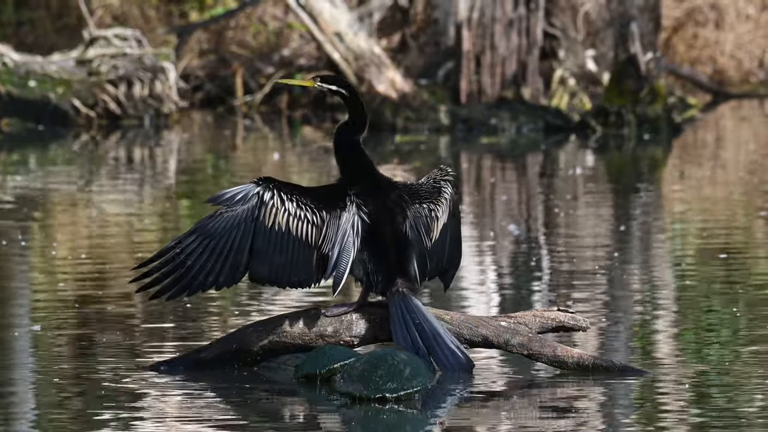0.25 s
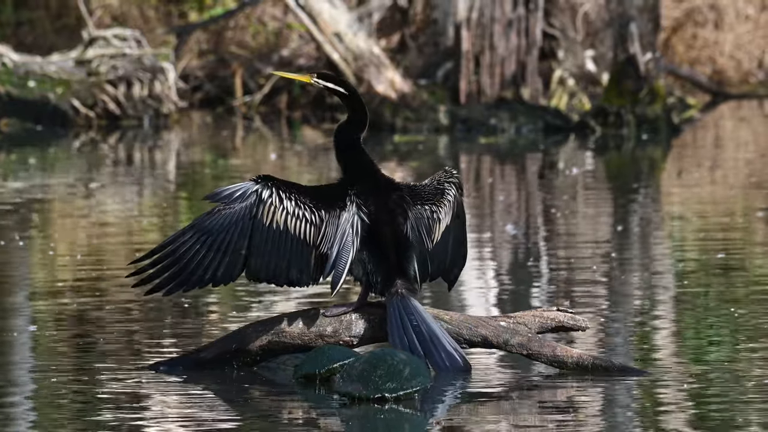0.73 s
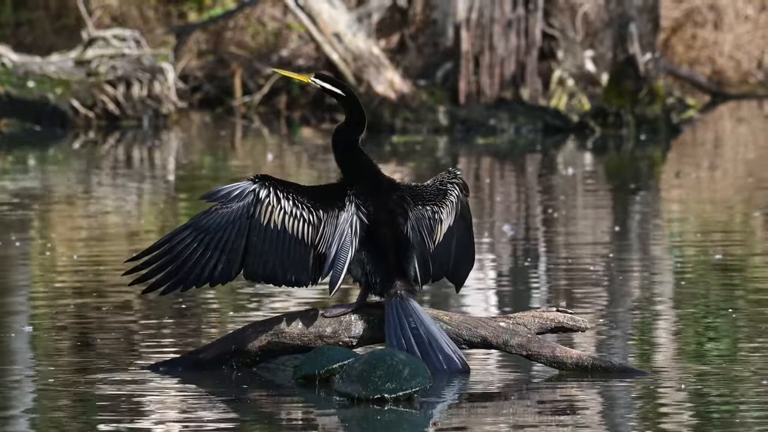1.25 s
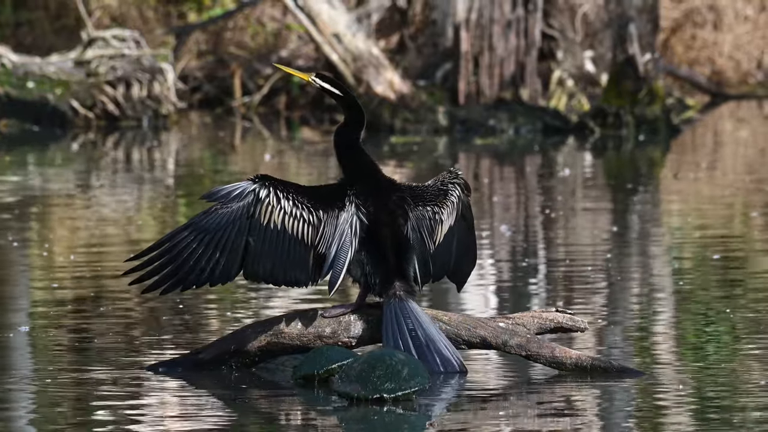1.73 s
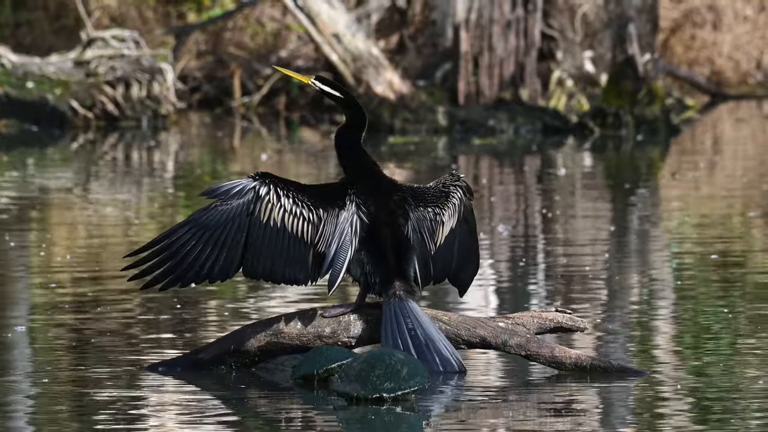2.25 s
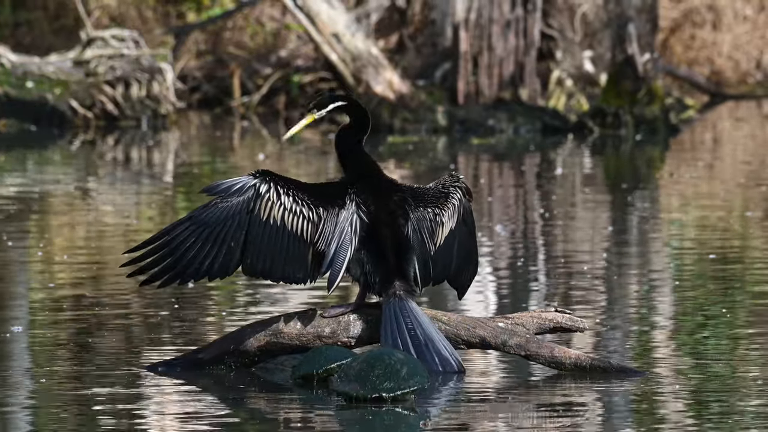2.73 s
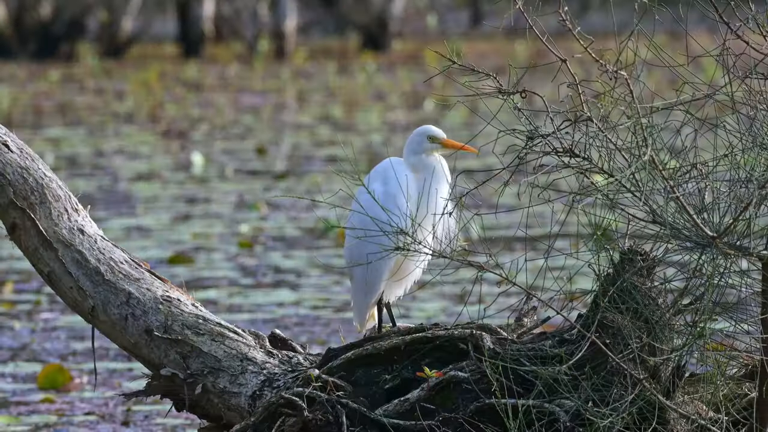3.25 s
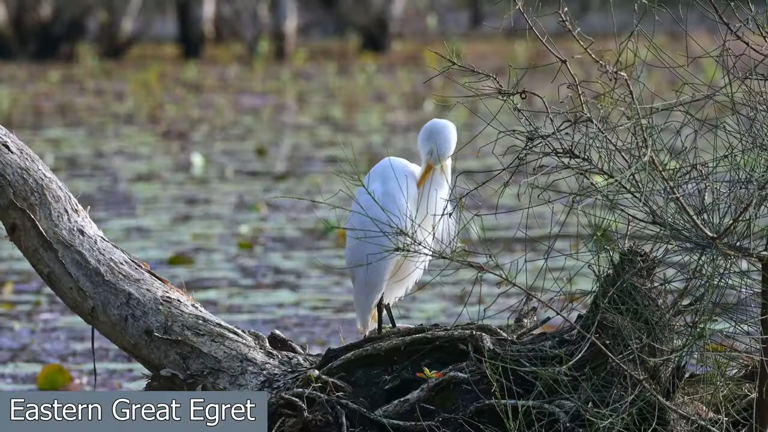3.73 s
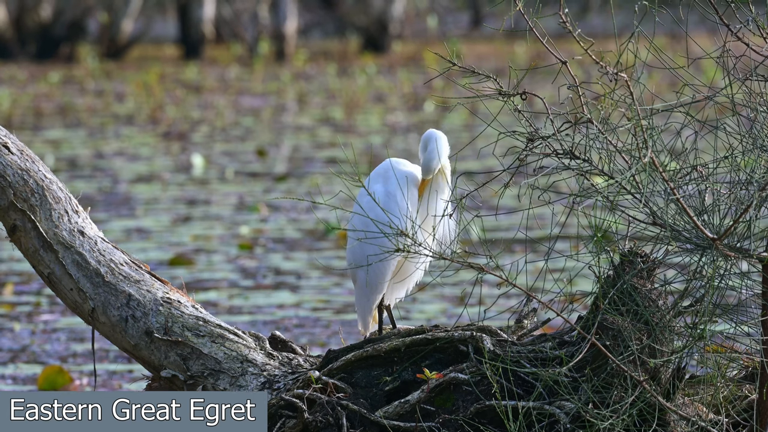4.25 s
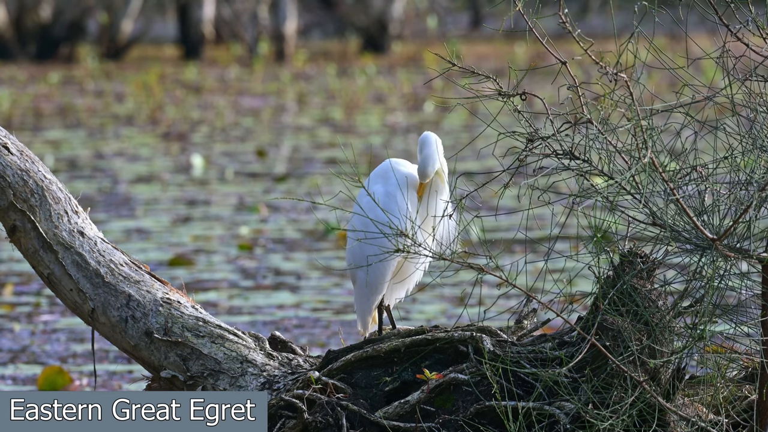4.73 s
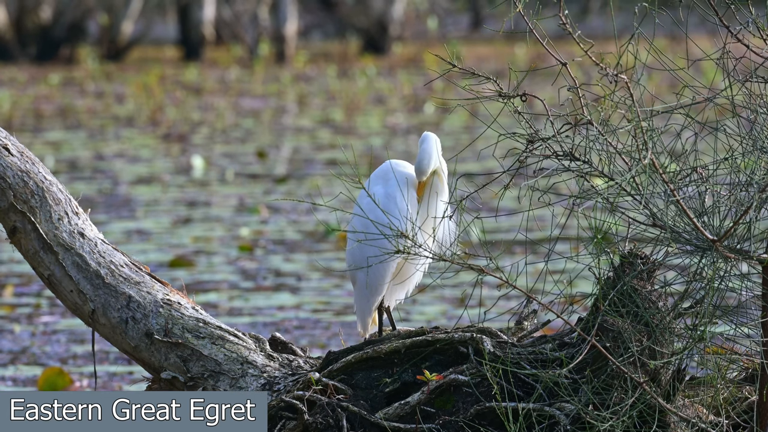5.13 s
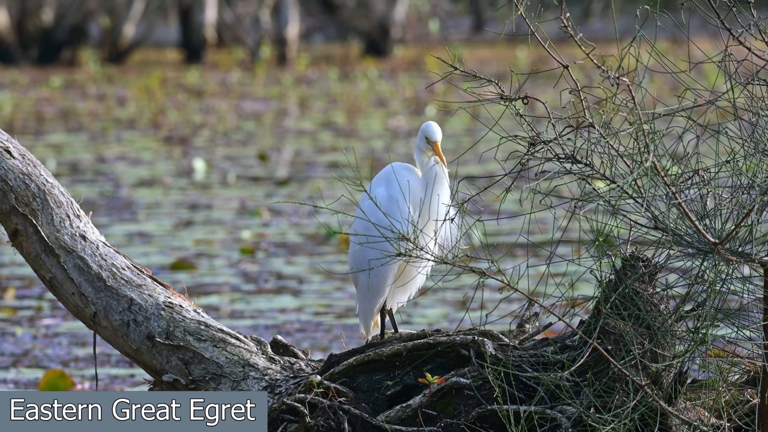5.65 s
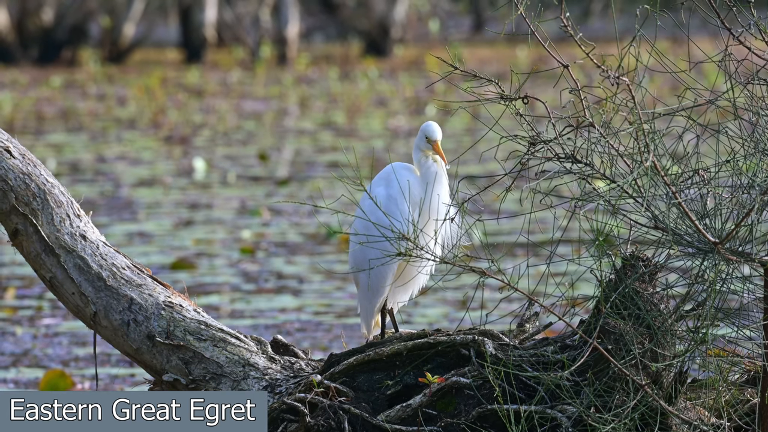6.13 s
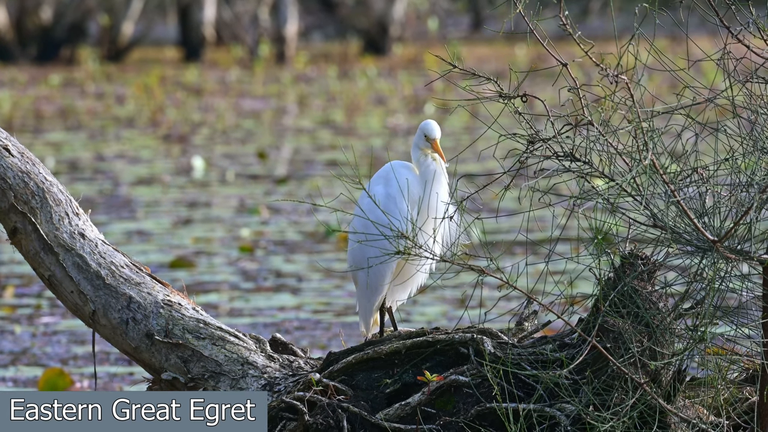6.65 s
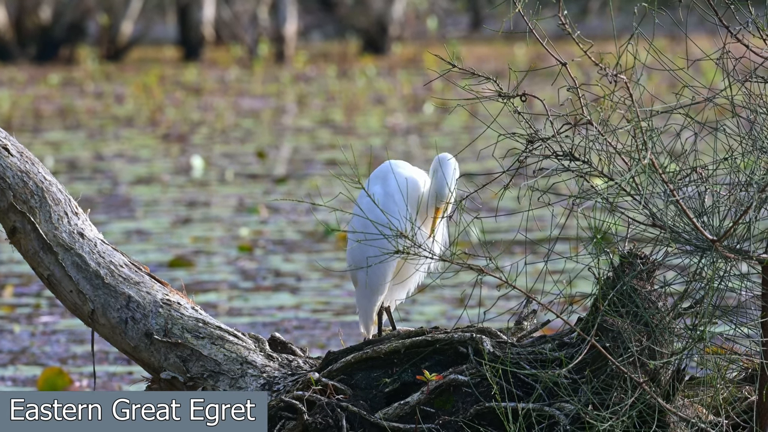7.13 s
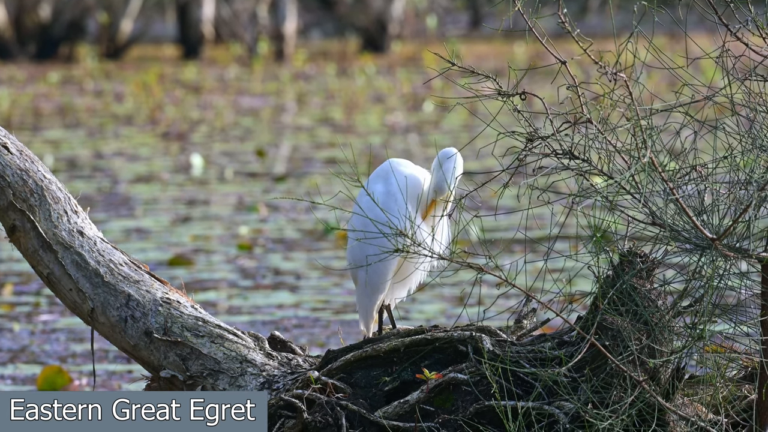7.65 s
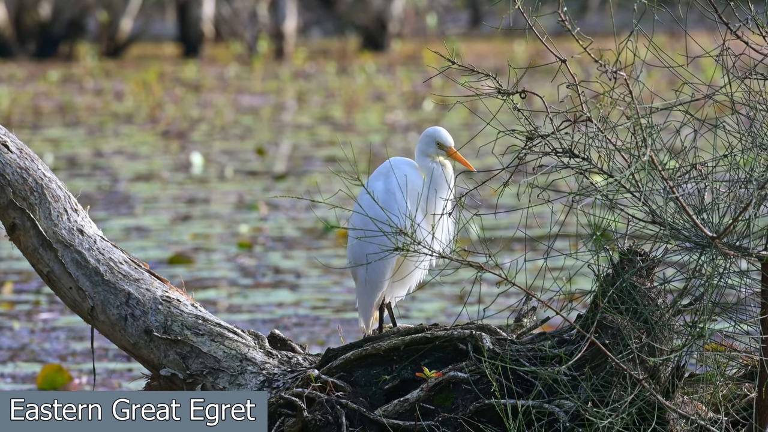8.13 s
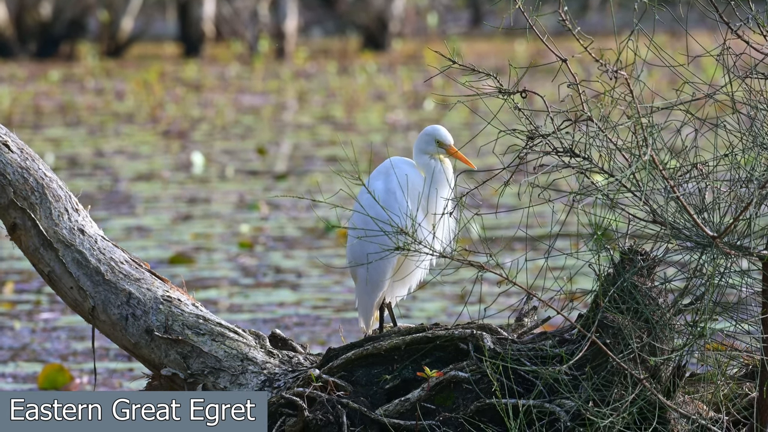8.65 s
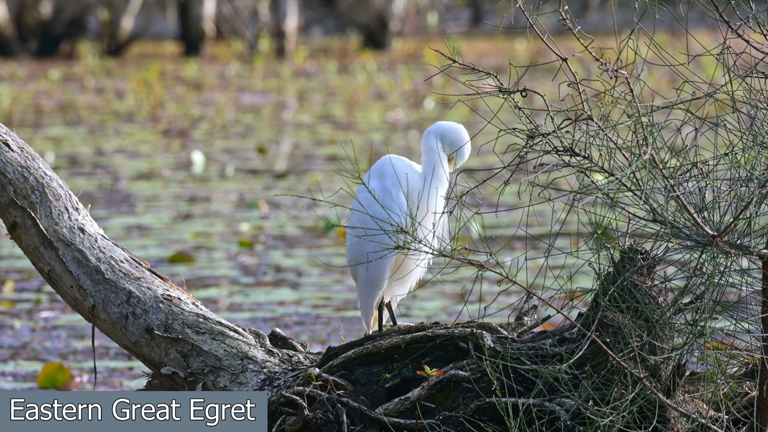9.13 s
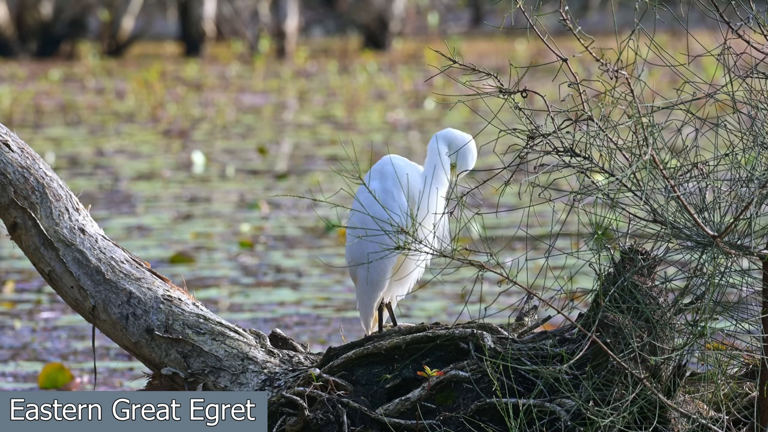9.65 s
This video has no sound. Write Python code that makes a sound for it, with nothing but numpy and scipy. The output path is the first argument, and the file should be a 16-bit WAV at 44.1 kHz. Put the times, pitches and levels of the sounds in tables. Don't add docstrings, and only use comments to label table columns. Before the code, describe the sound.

Dense small-bird chorus chirps and whistles over a steady low rumble and hiss, then after three seconds the background drops and brighter, more separate calls continue.

```python
import sys
import numpy as np
from scipy import signal
from scipy.fft import rfft, irfft, next_fast_len
from scipy.io import wavfile
from scipy.ndimage import uniform_filter1d, map_coordinates

SR = 44100
rng = np.random.default_rng(int(sys.argv[2]) if len(sys.argv) > 2 else 0)


def dump(signal):
    limited = np.clip(np.atleast_2d(signal).T, -1, 1)
    pcm = np.round(limited * 32767).astype(np.int16)
    wavfile.write(sys.argv[1], SR, pcm)


def voltage_ratio(level):
    return 10 ** (np.asarray(level, float) / 20)


N = 435708

# time in seconds, first place in dB, second place in dB.
PLACE_LEVELS = [(0, -45.5, -93), (2.85, -45.5, -55.5), (3.0, -52.5, -54), (3.2, -78.5, -58.5),
                (9.88, -100, -58)]
# frequency in Hz, level in dB per Hz.
ROAD_SPECTRUM = [(15, -24), (71, 2), (161, -1), (483, -8.5), (899, -9), (2400, -27), (6000, -55),
                 (9000, -47), (15000, -56)]
BANK_SPECTRUM = [(12, -46), (20, -17), (75, -2.5), (255, -6.5), (693, -20), (1890, -27.5), (2400, -22),
                 (3120, -59)]
# frequency in Hz, likeness from 0 to 1.
EAR_LIKENESS = [(30, 1), (200, 0.98), (500, 0.88), (1200, 0.65), (3000, 0.2), (8000, 0.23)]
# frequency in Hz, left minus right in dB.
EAR_LEAN = [(60, -0.5), (500, -0.5), (2500, -1.5), (8000, 4)]
# pitch in Hz, level in dB rms, place (0 first, 1 second).
MOTOR_HUMS = [(177.6, -60, 0), (893.6, -66, 0), (274.5, -68.5, 1)]

# lowest Hz, highest Hz.
FAR_RANGES = [(2500, 4680), (4600, 7570), (7400, 12100)]
# start in seconds, held seconds, level in dB, lead of the
# high voices in dB.
FAR_OUTBURSTS = [(0, 0.45, -41.5, -3.5), (.78, 0.067, -49.5, 3), (1.4, 0.22, -43, -6),
                 (2.12, 0.012, -41, -9.5), (2.3, 0.14, -50, -20), (2.7, 0.13, -47, -4), (1.75, .03, -51, 3),
                 (3.16, .01, -56, 0), (3.3, 0.2, -50.5, -1.5), (3.63, 0.051, -54.5, 2),
                 (4.05, 0.04, -75.5, 20.5), (4.37, .01, -47.5, -40), (4.46, 0.009, -57.5, 10.5),
                 (4.99, 0.015, -55, 2.5), (5.33, 0.015, -52, 5.5), (5.8, 0.046, -56, 4),
                 (6.26, 0.011, -50.5, -9), (6.4, 0.38, -54, 6.5), (7.08, .01, -48, -26),
                 (7.189, 0.0083, -51, 3), (7.43, 0.016, -46.5, -6), (8.01, 0.008, -53, -17),
                 (8.281, 0.12, -44.5, -6.5), (8.87, 0.017, -47.5, 3.5), (9.08, 0.24, -51.5, -7),
                 (9.85, .03, -51.5, -5.5)]
# share of the lead from 0 to 1, offset in dB, swell in dB
# per second, ebb in dB per second, lull in dB.
FAR_REGISTERS = [(0.016, -1, 47, 52.5, -59), (0.9, -3, 100, 102, -63.5), (0.3, -14.5, 261, 169, -91.5)]

PURE_OVERTONES = [0.5, -16, -33]
REEDY_OVERTONES = [0.5, -3, -13.5, -22.5, -20]
SHARP_OVERTONES = [-13, -6, -14, -12]
CROAK_OVERTONES = [-40, -40, -24, -5, 1.5, -10, -17, -14.5]
BUZZ_OVERTONES = [.5, -20, -14, -4]
NASAL_OVERTONES = [.5, 4, -14, -18]
SWOOP_OVERTONES = [.5, 0, -16, -22, -22]

# frequency in Hz, level in dB.
SQUAWK_MOUTH = [(800, -13.5), (1500, 7), (3000, 13.5), (4100, 18), (5500, 15.5), (7000, 8), (9000, -14),
                (15000, -26)]
CLIMB_MOUTH = [(3700, 0), (5000, 8), (6200, 2), (7200, -12), (9500, -11), (15000, -11)]

# start in seconds, length in seconds, start pitch in Hz,
# end pitch in Hz, level in dB.
CLEAR_SQUAWKS = [(3.29, 0.048, 1420, 1556, -62.5), (3.345, .055, 1266, 1350, -58),
                 (6.091, 0.081, 1336, 1330, -65), (8.225, 0.043, 1396, 1526, -60),
                 (9.193, 0.087, 991, 1158, -62.5), (9.278, 0.022, 1148, 1020, -64),
                 (5.257, 0.016, 1326, 1340, -60), (7.352, .018, 1330, 1350, -62.5)]
HARSH_SQUAWKS = [
    (.26, 0.24, 945, 1070, -64),
    (.655, 0.23, 930, 1000, -56.5),
    (9.09, 0.24, 986, 1042, -66),
]

# start in seconds, length in seconds,
# start pitch in Hz, end pitch in Hz, level in dB.
LEFT_PURE_CRESTS = [(0.002, 0.037, 5300, 5120, -46), (6.1, 0.063, 3960, 3920, -53),
                    (5.338, 0.05, 3750, 4340, -40), (6.183, 0.066, 3300, 4410, -43.5),
                    (7.018, 0.036, 3700, 4190, -51), (7.437, 0.045, 3910, 4310, -40.5),
                    (8.015, 0.033, 4060, 4160, -50.5)]
LEFT_PURE_SAGS = [(6.982, 0.045, 3380, 3660, -53.5), (7.372, 0.029, 3800, 4100, -42.5),
                  (8.234, 0.036, 3590, 3820, -48.5)]
RIGHT_PURE_CRESTS = [(1.998, .016, 4080, 3950, -46), (2.055, 0.017, 3950, 4070, -46),
                     (3.362, 0.059, 3900, 4000, -56), (3.862, 0.011, 3150, 3000, -43),
                     (4.209, 0.082, 4050, 4280, -50), (4.323, 0.035, 3290, 4340, -45),
                     (5.809, 0.018, 4500, 4070, -40), (6.556, 0.027, 4440, 4120, -37.5),
                     (7.456, 0.016, 2310, 2590, -42), (7.472, 0.011, 2600, 2350, -45),
                     (8.346, 0.021, 3940, 4000, -34.5), (8.428, 0.026, 4170, 3970, -31.5)]
RIGHT_PURE_SAGS = [(0.05, 0.175, 2130, 2440, -50), (.02, .19, 2760, 3100, -47.5),
                   (.02, .2, 2510, 2730, -52.5), (2.111, 0.01, 5860, 5730, -34.5),
                   (3.411, 0.045, 4305, 4530, -34), (5.271, 0.033, 3890, 4090, -34.5),
                   (6.527, 0.026, 3960, 4500, -41), (7.976, 0.037, 3650, 4230, -43.5),
                   (8.231, 0.03, 4200, 4670, -43), (4.958, .06, 4600, 4480, -56),
                   (9.014, 0.025, 7150, 7080, -40), (9.014, .027, 7480, 7500, -49),
                   (9.014, .027, 6800, 6750, -50)]
LEFT_REEDY_CRESTS = [(0.05, 0.053, 3160, 3230, -42.5), (2.745, 0.12, 2980, 3190, -44),
                     (1.5, .11, 3080, 3330, -48.5), (6.249, 0.023, 3600, 3650, -46),
                     (7.485, .02, 3550, 3650, -50.5), (5.318, .007, 3000, 3260, -45.5),
                     (7.052, .022, 3400, 3380, -56), (6.292, 0.013, 1920, 2056, -51),
                     (7.422, 0.0077, 2800, 3100, -44), (8.415, 0.017, 3220, 3000, -48.5),
                     (9.811, 0.05, 4020, 4340, -59.5)]
LEFT_REEDY_SAGS = [(5.389, 0.014, 3530, 3530, -47.5), (7.401, 0.021, 3070, 3180, -42),
                   (8.45, 0.036, 3230, 3320, -46)]
RIGHT_REEDY_CRESTS = [ (1.364, 0.041, 2990, 2730, -46), (2.166, 0.091, 2774, 2830, -43),
                      (2.17, .11, 2990, 2960, -56), (5.302, 0.025, 2930, 3040, -41.5),
                      (6.088, 0.088, 2650, 2637, -52.5), (8.313, 0.03, 2985, 2880, -42.5)]
RIGHT_REEDY_SAGS = [(0.1, 0.098, 3256, 3480, -37), (0.265, 0.15, 2700, 2874, -43.5),
                    (2.1, 0.066, 2746, 2770, -49), (2.45, 0.057, 2657, 3090, -45),
                    (4.368, 0.057, 2703, 2720, -42.5), (5.325, 0.013, 2860, 2920, -47),
                    (6.307, 0.058, 2480, 2620, -45.5), (6.581, 0.044, 3470, 3368, -45.5),
                    (6.166, 0.016, 2390, 2520, -49), (8.366, 0.031, 3285, 2806, -41),
                    (8.394, 0.029, 3240, 3110, -43), (1.984, .01, 2900, 2900, -50)]
AHEAD_FAINT_CRESTS = [(2.62, 0.064, 4550, 5000, -57), (4.682, 0.013, 2420, 2900, -52),
                      (4.694, .014, 2900, 2080, -49), (4.71, .016, 2100, 2090, -57),
                      (.51, .025, 3490, 3900, -57), (.535, 0.042, 3900, 3100, -60),
                      (.78, .05, 6000, 6050, -53), (.885, 0.036, 1400, 1744, -55.5),
                      (4.245, 0.05, 3900, 4050, -56), (4.286, .014, 2050, 2050, -57.5),
                      (4.315, .02, 1990, 2040, -56), (4.342, .024, 2020, 2150, -57),
                      (4.53, .014, 2050, 2050, -57), (4.554, .012, 2040, 2030, -55),
                      (4.58, .015, 1790, 1780, -58.5), (5.458, .009, 5900, 5800, -55),
                      (6.34, 0.055, 3350, 4150, -57), (6.475, 0.024, 4050, 4300, -50),
                      (6.49, .035, 3330, 2700, -53), (6.61, 0.044, 4850, 5200, -54),
                      (9.747, 0.071, 3700, 3750, -56), (9.78, 0.02, 2990, 2900, -53)]
AHEAD_FAINT_SAGS = [(2.905, 0.058, 5050, 4970, -54.5), (.89, .07, 5070, 4990, -54.5),
                    (3.815, .015, 2300, 4000, -59), (4.36, .028, 3850, 3650, -55),
                    (4.43, .025, 2660, 2050, -55), (5.225, .035, 2250, 2100, -62),
                    (8.3, .045, 1500, 1510, -62), (2.4, .035, 3250, 3700, -55),
                    (5.8, .015, 3500, 3650, -55), (6.25, 0.033, 2000, 2250, -59.5),
                    (7.428, .035, 4520, 4450, -53), (7.447, .009, 3200, 2350, -53),
                    (3.85, 0.011, 2080, 3600, -50.5), (9.634, 0.0245, 6280, 5840, -47),
                    (9.672, 0.01, 5300, 4900, -53), (9.849, 0.052, 2580, 2580, -59),
                    (5.271, 0.0055, 3150, 3300, -47.5), (6.9, .066, 3750, 3600, -64),
                    (2.135, .013, 3900, 3100, -55), (2.362, .008, 3700, 3000, -56),
                    (5.652, .025, 6950, 6000, -68), (.44, .03, 3300, 3200, -52),
                    (9.425, 0.062, 3870, 4070, -58.5)]
RIGHT_NASAL_CRESTS = [(2.06, .035, 2720, 2800, -55), (2.085, .016, 3300, 3750, -58),
                      (5.826, .05, 3380, 3560, -62), (2.715, .042, 2620, 3020, -52),
                      (8.855, .03, 2800, 3300, -54), (8.915, .025, 3200, 3300, -54),
                      (1.72, .06, 2850, 2700, -58)]
RIGHT_NASAL_SAGS = [(6.893, .09, 2560, 2480, -66), (9.262, .02, 2900, 2800, -57),
                    (2.41, .04, 2860, 2630, -55), (8.93, .015, 2850, 2900, -54),
                    (8.958, .012, 3000, 3050, -53), (8.384, .012, 2850, 2800, -50)]
LOW_CROAKS = [
    (1.49, .14, 314.8, 284, -41),
    (2.676, .135, 305.5, 293.7, -45.5),
]
BUZZ_NOTES = [
    (1.195, .205, 1995, 2150, -46),
    (.65, .09, 3620, 3780, -41),
    (.27, .04, 3750, 3850, -45),
    (.335, .12, 3850, 4350, -52),
]

# time in seconds, pitch in Hz, level in dB.
LOW_WARBLES = [
    [(3.545, 1406, -67), (3.573, 1635, -51), (3.583, 1893, -50), (3.605, 1833, -42.5), (3.629, 1455, -49),
     (3.643, 1461, -47.5), (3.659, 1613, -40.5), (3.673, 2043, -42), (3.697, 2073, -47)],
    [(7.316, 1930, -60), (7.322, 1850, -46), (7.33, 1700, -47), (7.344, 1776, -39), (7.354, 1863, -46),
     (7.362, 1769, -44), (7.366, 1687, -56), (7.374, 1533, -46), (7.392, 1524, -59)],
    [(8.966, 1493, -54), (8.98, 1992, -53.5), (9.012, 1905, -46.5), (9.044, 1403, -56), (9.074, 1477, -49),
     (9.086, 1700, -37.5), (9.126, 2170, -40.5), (9.146, 1760, -41), (9.165, 1670, -56)],
]
LOOP_PHRASES = [
    [(1.02, 3755, -67), (1.028, 3787, -49), (1.048, 4243, -45), (1.086, 4431, -50), (1.098, 4254, -44),
     (1.11, 3465, -50), (1.138, 3762, -42), (1.168, 3944, -46), (1.18, 3854, -54)],
    [(1.392, 3747, -54), (1.408, 4063, -37), (1.418, 4099, -33), (1.43, 4090, -37), (1.438, 3596, -43),
     (1.45, 3556, -41), (1.472, 4249, -39), (1.484, 4231, -39), (1.495, 4078, -45)],
]
ARCH_PHRASE = [
    [(8.938, 4165, -55), (8.95, 4145, -53), (8.974, 4607, -52), (8.994, 4608, -46), (9.016, 4364, -53),
     (9.025, 4600, -54)],
]
CLIMB_PHRASES = [
    [(4.422, 2819, -52), (4.428, 2834, -53), (4.434, 2662, -49), (4.456, 3152, -49), (4.49, 3249, -42),
     (4.51, 3537, -41), (4.528, 3637, -39), (4.538, 3627, -45), (4.545, 3602, -57)],
    [(6.366, 2518, -53), (6.376, 2511, -50), (6.38, 2618, -63), (6.384, 2840, -50), (6.404, 3048, -48),
     (6.44, 3115, -42), (6.454, 3392, -41), (6.478, 3514, -43), (6.49, 3435, -52)],
    [(5.715, 2546, -69), (5.729, 2624, -67), (5.757, 2923, -57), (5.775, 2996, -61), (5.791, 2843, -62),
     (5.8, 3388, -66)],
]
SWOOP_PHRASE = [
    [(7.1, 2800, -56), (7.13, 2600, -58), (7.155, 2330, -57), (7.172, 2900, -60), (7.19, 3600, -56),
     (7.215, 3450, -53), (7.235, 3330, -55), (7.255, 3480, -50), (7.262, 3480, -60)],
]

# seconds from its middle, pitch in Hz.
TRILL_SHAPE = [(-.007, 2763), (-.002, 3143), (.002, 3287), (.006, 3102), (.011, 2400), (0.016, 2320)]
TRILL_TIMES = [7.546, 7.6296, 7.702, 7.774, 7.8454, 7.9187, 7.99, 8.0615, 8.1332, 8.201, 8.281, 8.352,
               8.422, 8.4978, 8.5735, 8.651, 8.734, 8.81, 8.879, 8.959, 9.0279]
# time of the top in seconds, peak level in dB.
SHARP_CALLS = [(2.105, -51), (3.056, -65), (3.166, -63), (3.294, -59.5), (3.462, -54.5), (3.642, -58.5),
               (3.855, -70.5), (4.69, -71), (8.01, -64.5), (8.268, -54), (9.645, -74)]
# seconds after its top, pitch in Hz.
SHARP_SHAPE = [(-.016, 2893), (-.006, 3487), (0, 3684), (.004, 3260), (.009, 2700), (0.022, 2530)]


def rms_one(x):
    return x / np.sqrt(np.mean(x ** 2) + 1e-20)


def in_time(rows):
    s, *columns = np.transpose(rows)
    return [np.interp(np.arange(N) / SR, s, c) for c in columns]


def at_hz(points, hz):
    table_hz, values = np.transpose(points)
    return np.interp(np.log(np.maximum(hz, 1)), np.log(table_hz), values)


def drift(rate, size=N):
    at = np.arange(size) * rate / SR
    points = rng.standard_normal(2 + int(size * 300 / SR))
    return map_coordinates(points, [at], order=3)


def add(out, start_s, sound):
    at = max(round(start_s * SR), 0)
    out[at:at + len(sound)] += sound[:N - at]


def air(spectrum):
    size = next_fast_len(N)
    hz = np.fft.rfftfreq(size, 1 / SR)
    mid, side = rfft(rng.standard_normal((2, size)))
    alike = np.clip(at_hz(EAR_LIKENESS, hz), 0, 1)
    lean = voltage_ratio(at_hz(EAR_LEAN, hz) / 2)
    pair = np.sqrt(1 + alike) * mid + np.sqrt(1 - alike) * side * [[1], [-1]]
    pair = pair * [lean, 1 / lean]
    return rms_one(irfft(pair * voltage_ratio(at_hz(spectrum, hz)), size)[:, :N])


def background(first_db, second_db):
    t = np.arange(N) / SR
    ground = voltage_ratio(first_db + 0.5 * drift(2.51)) * air(ROAD_SPECTRUM)
    ground += voltage_ratio(second_db + 0.35 * drift(2.43)) * air(BANK_SPECTRUM)
    for hz, db, place in MOTOR_HUMS:
        place_db = (first_db, second_db)[place]
        fade_db = place_db - place_db.max()
        tone = np.sin(2 * np.pi * hz * t + drift(5))
        ground += np.sqrt(2) * voltage_ratio(db + fade_db + 2.2 * drift(5.4)) * tone
    return ground


def trees(x):
    fade_60db_s, gap_s = 0.45, 0.0083
    t = np.arange(SR) / SR
    tail = rng.standard_normal((2, SR)) * voltage_ratio(-60 * t / fade_60db_s) * (t > gap_s)
    tail = signal.lfilter([0.5], [1, -0.45], tail)
    tail = tail / np.sqrt(np.sum(tail ** 2, axis=1, keepdims=True))
    return signal.fftconvolve(x, tail, axes=1)[:, :N]


def outbursts(share, offset_db, swell, ebb, lull_db):
    t = np.arange(0, N, 64) / SR
    s, held, db, lead_db = np.transpose(FAR_OUTBURSTS)[:, :, None]
    each = db + share * lead_db + offset_db
    each = each - swell * np.maximum(s - t, 0) - ebb * np.maximum(t - s - held, 0)
    in_first = t < PLACE_LEVELS[2][0]
    lull = lull_db + share * -11 * in_first
    return np.interp(np.arange(N) / SR, t, np.maximum(each.max(axis=0), lull))


def far_chorus():
    crowd = np.zeros((2, N))
    for at, length, pitch, bend, size, side in rng.random((2500, 6)):
        t = np.arange(int((0.0057 + 0.036 * length) * SR))
        hz = 2500 * 2.7 ** pitch * (1 + 0.29 * (bend - 0.4) * t / len(t))
        phase = 2 * np.pi * np.cumsum(hz) / SR
        note = voltage_ratio(9.0 * size) * np.hanning(len(t)) * (np.sin(phase) + 0.24 * np.sin(2 * phase))
        add(crowd[0], at * N / SR, note * voltage_ratio(22.2 * (side - 0.5)))
        add(crowd[1], at * N / SR, note * voltage_ratio(18.4 * (0.5 - side)))
    distance = signal.cheby2(8, 40, 14000, fs=SR, output="sos")
    crowd = signal.sosfilt(distance, crowd)
    wash = air([(2000, 0), (6500, -4), (8000, -11), (15000, -15)])
    blur = 0.54 * rms_one(crowd) + 0.71 * rms_one(trees(crowd)) + 0.5 * wash
    out = 0
    for band_hz, register in zip(FAR_RANGES, FAR_REGISTERS):
        band_filter = signal.butter(5, band_hz, "band", fs=SR, output="sos")
        band = signal.sosfilt(band_filter, blur)
        out = out + voltage_ratio(outbursts(*register) - 2.5 + 2.6 * drift(14)) * rms_one(band)
    return out * voltage_ratio([[-0.8], [0.8]])


def breath(song, level_db, smear_s):
    loudness = uniform_filter1d(np.abs(song), size=int(smear_s * SR))
    bright = signal.butter(3, [7600, 15700], "band", fs=SR, output="sos")
    top = signal.butter(2, 13000, "high", fs=SR, output="sos")
    hiss = signal.sosfilt(bright, rng.standard_normal((2, N)))
    hiss = hiss + 1.5 * signal.sosfilt(top, hiss)
    return voltage_ratio(level_db) * loudness * hiss


def syrinx(hz, overtone_db, edge, wobble_db):
    size = len(hz)
    u = np.linspace(0, 1, size)
    phase = 2 * np.pi * (np.cumsum(hz * (1 + 0.0045 * drift(150, size))) / SR + rng.random())
    tone = 0
    for k, db in enumerate(overtone_db, 1):
        level = voltage_ratio(db + wobble_db * np.sqrt(k) * drift(131.3, size))
        tone = tone + level * np.sin(k * phase) * (k * hz < 0.36 * SR)
    return tone * np.sin(np.pi / 2 * np.clip(np.minimum(u, 1 - u) / edge, 0, 1)) ** 2


CREST, SAG = 0.8, -0.421


def glide(length_s, start_hz, end_hz, bow):
    u = np.linspace(-1, 1, round(length_s * SR))
    mean_hz = (start_hz + end_hz) / 2
    mid_hz = mean_hz * (1 + 0.02005 * bow) + bow * abs(end_hz - start_hz) / 2
    return mid_hz + u * (end_hz - start_hz) / 2 + u * u * (mean_hz - mid_hz)


def squawks(calls, harsh):
    out = np.zeros(N)
    throat = signal.butter(3, [2600, 7000], "band", fs=SR, output="sos")
    for s, length, *pitches, db in calls:
        hz = glide(length, *pitches, CREST)
        size = len(hz)
        overtones = at_hz(SQUAWK_MOUTH, pitches[1] * np.arange(1, 15))
        stack = syrinx(hz, overtones, 0.1, wobble_db=1.0)
        hiss = rms_one(signal.sosfilt(throat, rng.standard_normal(size))) * np.hanning(size) ** 0.22
        rattle = np.cos(np.pi * np.cumsum(70 * (1 + 0.246 * drift(28.9, size))) / SR) ** 8
        voice = (1 - 0.58 * harsh) * stack + 4.7 * harsh * hiss
        add(out, s, voltage_ratio(db) * voice * (1 - 0.5 * harsh + 0.97 * harsh * rattle))
    return out


def warbler(phrases, overtone_db, lift_db, slap_db, wobble_db, throat=((1, 0), (2, 0))):
    out = np.zeros(N)
    for phrase in phrases:
        s, hz, db = np.transpose(phrase)
        t = np.arange(s[0], s[-1], 1 / SR)
        pitch = uniform_filter1d(np.interp(t, s, hz), size=140, mode="nearest")
        shaped_db = [v + at_hz(throat, k * pitch) for k, v in enumerate(overtone_db, 1)]
        level = voltage_ratio(np.interp(t, s, db) + lift_db)
        add(out, s[0], level * syrinx(pitch, shaped_db, 0.034, wobble_db))
    return out + voltage_ratio(slap_db) * np.roll(out, int(0.042 * SR))


def repeated(events, note, overtone_db, lift_db):
    out = np.zeros(N)
    s, hz = np.transpose(note)
    pitch = uniform_filter1d(np.interp(np.arange(s[0], s[-1], 1 / SR), s, hz), size=90)
    for at, db in events:
        varied = pitch * (1 + 0.0142 * rng.standard_normal())
        add(out, at + s[0], voltage_ratio(db + lift_db) * syrinx(varied, overtone_db, 0.43, wobble_db=1.9))
    return out


def trill():
    s = np.array(TRILL_TIMES)
    weak = (s < 7.5) | (s > 8.77)
    db = -38 - 0.5 * (s - s[0]) - 12 * weak
    notes = repeated(zip(s, db), TRILL_SHAPE, [0.5, -27], lift_db=-0.8)
    return notes + voltage_ratio(-15) * np.roll(notes, int(0.025 * SR))


def whistles(crests, sags, overtone_db, lift_db, flick, soft=0.004):
    out = np.zeros(N)
    beak_hz, beak_db_per_khz = 6800, 0.5
    for (s, length, *pitches, db), bow in [(n, CREST) for n in crests] + [(n, SAG) for n in sags]:
        hz = np.pad(glide(length, *pitches, bow), round(soft * SR), "edge")
        hz = hz * (1 + flick * np.exp(-np.arange(len(hz)) / (0.00287 * SR)))
        overtone_hz = np.arange(1, len(overtone_db) + 1) * hz.mean()
        above_khz = np.maximum(overtone_hz - beak_hz, 0) / 1000
        edge = 2 * soft / (length + 2 * soft)
        note = syrinx(hz, overtone_db - beak_db_per_khz * above_khz, edge, wobble_db=1.76)
        add(out, s - soft, voltage_ratio(db + lift_db) * note)
    return out


def buzzer():
    purr = 1 + 0.9 * np.sin(2 * np.pi * 110 * np.arange(N) / SR)
    return purr * whistles(BUZZ_NOTES, [], BUZZ_OVERTONES, lift_db=0, flick=0)


def left_birds():
    song = whistles(LEFT_PURE_CRESTS, LEFT_PURE_SAGS, PURE_OVERTONES, lift_db=5.5, flick=0)
    song += whistles(LEFT_REEDY_CRESTS, LEFT_REEDY_SAGS, REEDY_OVERTONES, lift_db=2.0, flick=0.121)
    song += warbler(LOOP_PHRASES, [0.5, -23], lift_db=4.0, slap_db=-25, wobble_db=1.5)
    song += warbler(CLIMB_PHRASES[1:2], [0] * 6, lift_db=4.0, slap_db=-25, wobble_db=1.5,
                    throat=CLIMB_MOUTH)
    return song


def right_birds():
    song = whistles(RIGHT_PURE_CRESTS, RIGHT_PURE_SAGS, PURE_OVERTONES, lift_db=-1.3, flick=0)
    song += buzzer()
    song += whistles(RIGHT_NASAL_CRESTS, RIGHT_NASAL_SAGS, NASAL_OVERTONES, lift_db=0, flick=0.1)
    song += whistles(RIGHT_REEDY_CRESTS, RIGHT_REEDY_SAGS, REEDY_OVERTONES, lift_db=0.8, flick=0.1396)
    song += squawks(CLEAR_SQUAWKS, harsh=0.25)
    song += squawks(HARSH_SQUAWKS, harsh=1.0)
    song += warbler(ARCH_PHRASE, [0.5, -7, -20], lift_db=6.0, slap_db=-25, wobble_db=2.5)
    song += warbler(SWOOP_PHRASE, SWOOP_OVERTONES, lift_db=4.0, slap_db=-25, wobble_db=2.5)
    return song


def ahead_birds():
    song = whistles(AHEAD_FAINT_CRESTS, AHEAD_FAINT_SAGS, PURE_OVERTONES, lift_db=3.0, flick=0)
    song += warbler(CLIMB_PHRASES[::2], [0] * 6, lift_db=5.5, slap_db=-25, wobble_db=1.5,
                    throat=CLIMB_MOUTH)
    return song


def low_birds():
    song = warbler(LOW_WARBLES, PURE_OVERTONES[:1], lift_db=3.5, slap_db=-11, wobble_db=4.5)
    return song + whistles(LOW_CROAKS, [], CROAK_OVERTONES, lift_db=4.0, flick=0, soft=0.018)


def perch(x, left_db, lag):
    return np.array([voltage_ratio(left_db / 2) * np.roll(x, round(lag)), voltage_ratio(-left_db / 2) * x])


def dull(x, leak):
    steep = signal.butter(20, 7070, fs=SR, output="sos")
    gentle = signal.butter(4, 10400, fs=SR, output="sos")
    return (1 - leak) * signal.sosfiltfilt(steep, x) + leak * signal.sosfiltfilt(gentle, x)


def scene():
    first_db, second_db = in_time(PLACE_LEVELS)
    ground = background(first_db, second_db)
    left, right, ahead = left_birds(), right_birds(), ahead_birds()
    haze = far_chorus() + breath(left + right + ahead, level_db=-36.0, smear_s=0.02)

    near = perch(left, left_db=3.0, lag=-1) + perch(right, left_db=-6.5, lag=3)
    near += perch(ahead + trill(), left_db=-3.5, lag=2)
    sharp = repeated(SHARP_CALLS, SHARP_SHAPE, SHARP_OVERTONES, lift_db=11.5)
    near += perch(sharp, left_db=-8.0, lag=2) + breath(sharp, level_db=1.5, smear_s=0.035)
    low = perch(low_birds(), left_db=-1.5, lag=5)
    near = near + low + voltage_ratio(-10.5) * trees(near + voltage_ratio(-1.5) * low)

    first_birds = dull(near, leak=0.2) + dull(haze, leak=0.045)
    return np.where(first_db > second_db, first_birds, near + haze) + ground


def roll_off(x):
    return signal.sosfilt(signal.butter(12, 15710, fs=SR, output="sos"), x)


def record(dry):
    return roll_off(dry)


dry = scene()
out = record(dry)
dump(out)
```